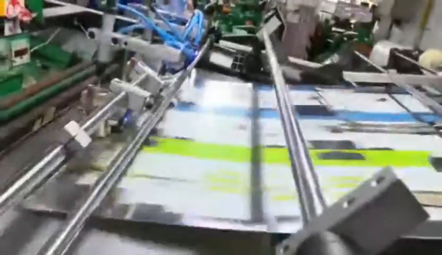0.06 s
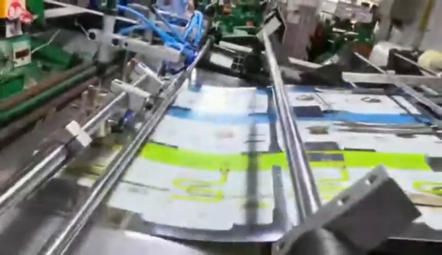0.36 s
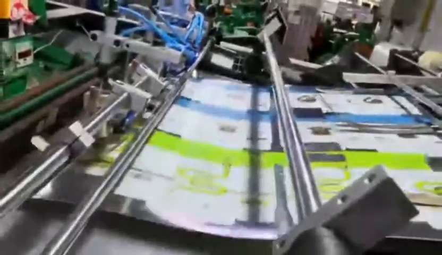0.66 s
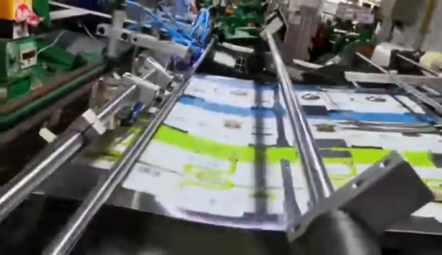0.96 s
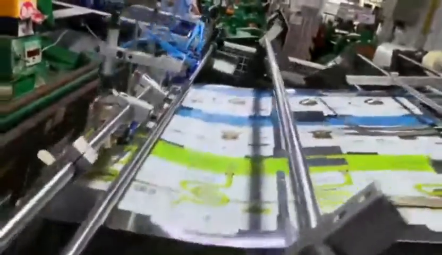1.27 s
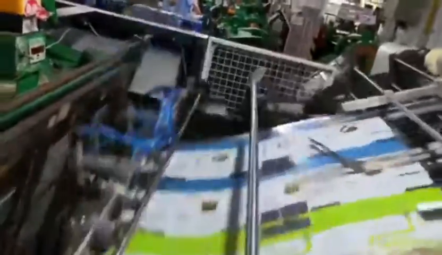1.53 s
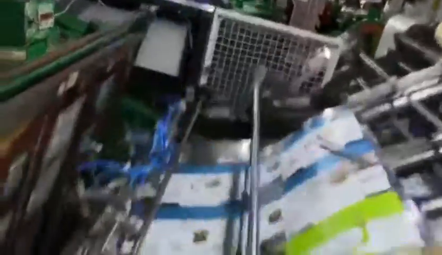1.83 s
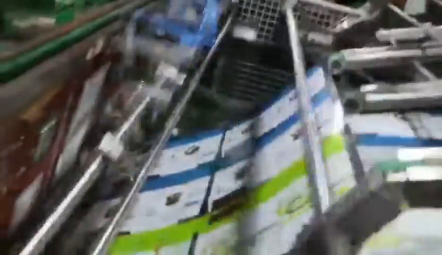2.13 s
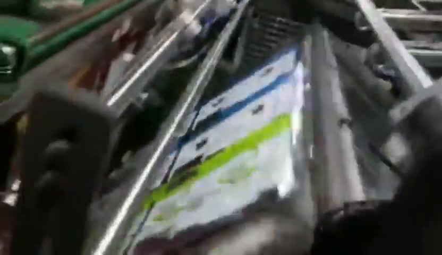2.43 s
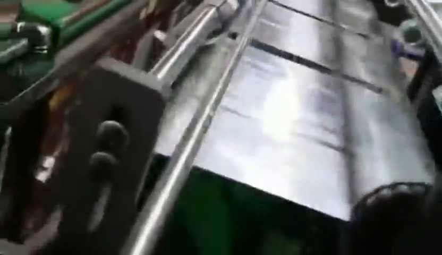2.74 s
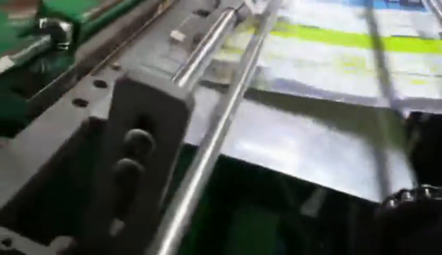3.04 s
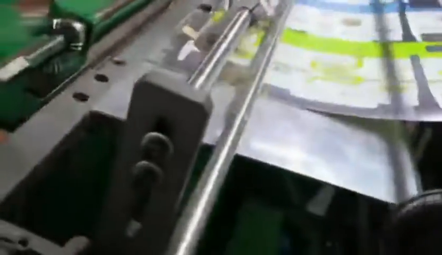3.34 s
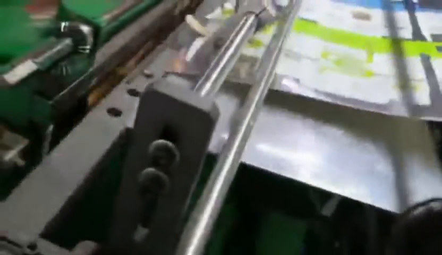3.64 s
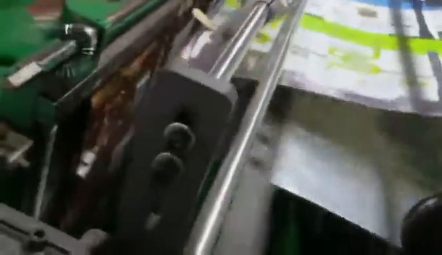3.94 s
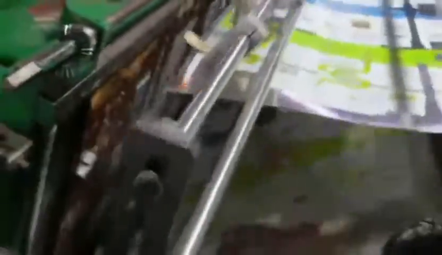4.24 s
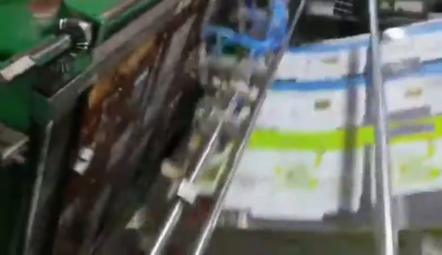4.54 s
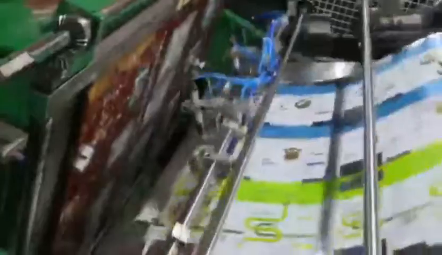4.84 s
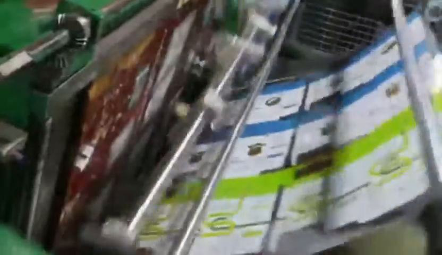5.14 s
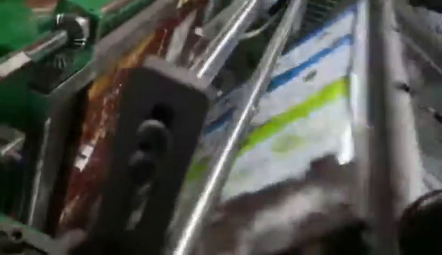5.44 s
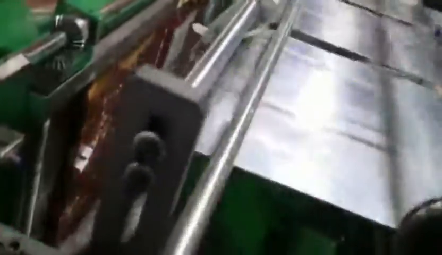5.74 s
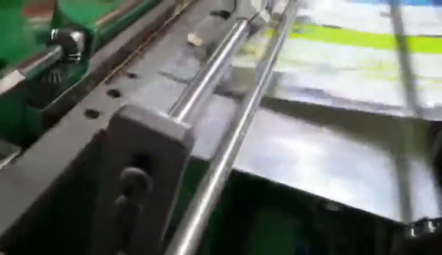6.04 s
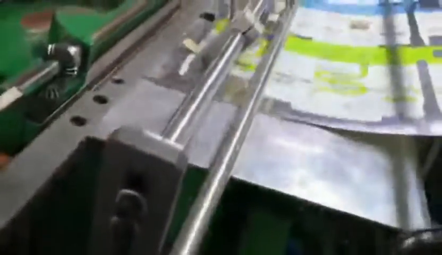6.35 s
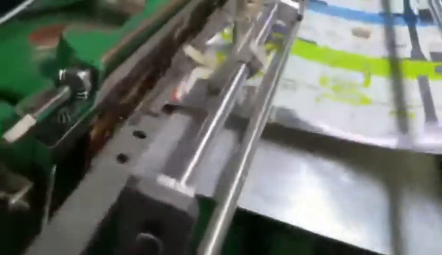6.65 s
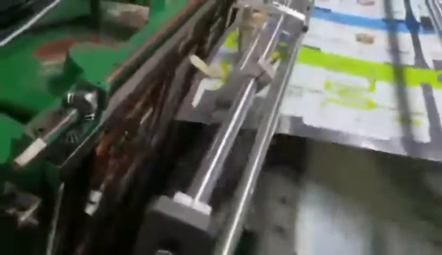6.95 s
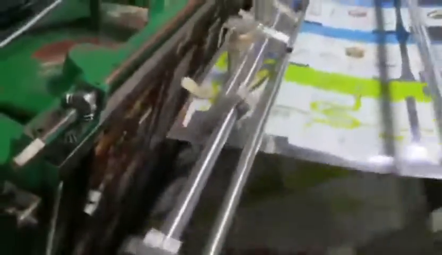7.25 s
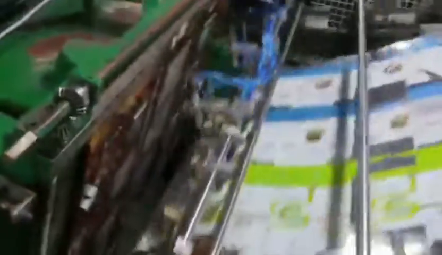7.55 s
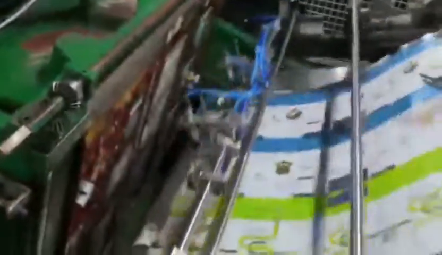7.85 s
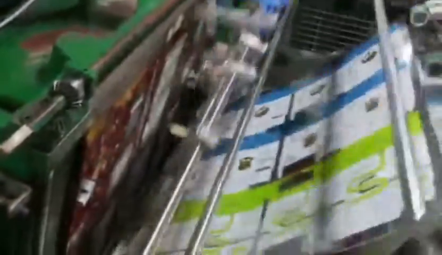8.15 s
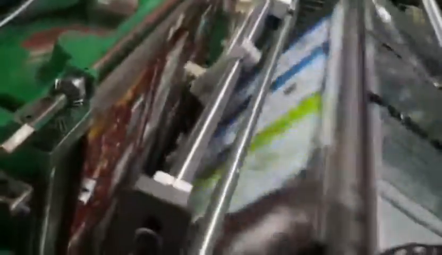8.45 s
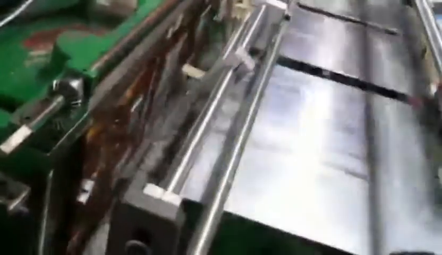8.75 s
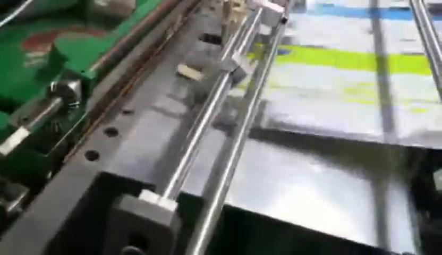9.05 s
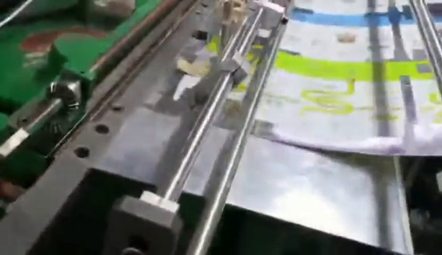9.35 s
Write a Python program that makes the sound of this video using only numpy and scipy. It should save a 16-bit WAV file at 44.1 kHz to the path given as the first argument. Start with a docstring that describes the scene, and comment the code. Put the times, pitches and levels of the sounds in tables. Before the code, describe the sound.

A die-cutting machine runs in a workshop, its drive droning and whining under a dense clatter of chains and a thin hiss of air. About every three seconds levers clash and the heavy press plate lands with a dull crash and a shuddering thump. Between the thumps come a sharp metal clack and a faint swish of a sheet. It sounds close, with the brighter sounds to the right.

```python
"""A die-cutting machine in a workshop

The machine cuts one sheet about every three seconds. Its drive drones and whines under a dense clatter
of chains and cams. In each cycle levers clash, the platen (the heavy pressing plate) thumps the frame,
air hisses, the gripper bar that pulls the sheet clacks against its stop, and the sheet swishes away.
The bright sounds lie to the right."""
import sys
import numpy as np
from scipy import signal
from scipy.fft import rfft, irfft, next_fast_len
from scipy.io import wavfile
from scipy.ndimage import uniform_filter1d

SR = 44100
rng = np.random.default_rng(int(sys.argv[2]) if len(sys.argv) > 2 else 0)


def transcribe(signal):
    """Save signal, clipped to [-1, 1], as a 16-bit WAV file at the path in sys.argv[1]."""
    frames = np.atleast_2d(signal).T
    limited = np.clip(frames, -1, 1)
    pcm = np.round(limited * 32767).astype(np.int16)
    wavfile.write(sys.argv[1], SR, pcm)


N = 422919
CYCLE_S, CYCLES = 2.975, 4

# The clatter and whine dip briefly after the crash. Each row: seconds into the cycle, change in dB.
CLATTER_LEVEL = [(.1, -1), (.35, 0.5), (.55, -3), (.75, 0.5), (.95, 0.5), (1.1, 2), (1.47, -0.5),
                 (1.7, 1.5), (2.2, 0.5), (2.5, 1.5), (2.7, -0.5), (2.85, 2)]
# The gripper bar hits its stop. Each row: start in seconds, level in dB, pitch in Hz.
BAR_CLACKS = [(1.837, -5, 1495), (4.78, -5.5, 1466), (7.741, -5, 1466)]


def amp(db):
    """Turns decibels into a gain."""
    return 10 ** (np.asarray(db) / 20)


def evened(x):
    """Scales a signal to an average (rms) level of one."""
    return x / np.sqrt(np.mean(x ** 2) + 1e-20)


def value_at(points, hz):
    """Reads between the rows of a table along a logarithmic frequency axis."""
    f, value = np.transpose(points)
    return np.interp(np.log(hz + 1), np.log(f + 1), value)


def add(mix, s, sound):
    """Lays a two-channel sound into the mix at s seconds."""
    part = mix[:, max(round(s * SR), 0):][:, :sound.shape[1]]
    part += sound[:, :part.shape[1]]


def cycling(points):
    """A level curve in dB that comes round in every cycle."""
    return np.interp(np.arange(N) / SR, *np.transpose(points), period=CYCLE_S)


def each_cycle(rows):
    """Repeats the events of one cycle for as long as the machine runs."""
    return [(cycle * CYCLE_S + s, *rest) for cycle in range(CYCLES)
            for s, *rest in rows if cycle * CYCLE_S + s < N / SR]


def coloured(x, spectrum):
    """Filters x so that white noise of level one takes the given spectrum."""
    size = next_fast_len(x.shape[1] + 4096)
    gain = amp(value_at(spectrum, np.fft.rfftfreq(size, 1 / SR))) * np.sqrt(SR / 2)
    return irfft(rfft(x, size) * gain, size)[:, :x.shape[1]]


def ringing(modes):
    """Narrow resonances kept ringing by random shaking."""
    size = next_fast_len(N)
    f = np.fft.rfftfreq(size, 1 / SR)
    power = sum(amp(db) ** 2 * evened(1 / (1 + (2 * (f - hz) / width) ** 2)) ** 2
                for hz, width, db in modes)
    return irfft(rfft(rng.standard_normal((2, size))) * np.sqrt(power), size)[:, :N]


def patchy(x, depth_db, width_hz, hold_s):
    """Lets narrow bands of the noise swell and fade at random, giving a mottled texture."""
    bands = signal.stft(x, nperseg=1024, noverlap=768)[2]
    swell = rng.standard_normal(bands.shape[1:])
    for axis, span in enumerate([width_hz * 1024 / SR, hold_s * SR / 256]):  # smooth in pitch, then time
        bell = np.exp(-(np.arange(-40, 41) / span * 2) ** 2)
        swell = signal.fftconvolve(swell, np.expand_dims(bell, 1 - axis), "same")
    gain = evened(amp(depth_db * evened(swell)))
    return signal.istft(bands * gain, nperseg=1024, noverlap=768)[1][:, :N]


def workshop(x, t60, wet_db):
    """Adds echoes from the housing and walls, which fade by 60 dB in t60 seconds."""
    t = np.arange(SR // 2) / SR
    tail = rng.standard_normal((2, len(t))) * amp(-60 * t / t60) * (1 - np.exp(-t / 0.0033))
    return x + amp(wet_db) * signal.oaconvolve(x, tail / np.linalg.norm(tail[0]), axes=1)[:, :N]


def drive(throb_hz=16.1, throb_db=1.5):
    """Panels drone with the load, gears whine along with the chains, and the floor rumbles."""
    # Ringing panels and frame, then gear and pump whines. Each row: pitch in Hz, width in Hz, level in dB.
    panels = [(81.2, 4.2, -38), (97.5, 32, -44), (157.6, 16, -24.5), (170.6, 21, -28.5), (195.4, 7.1, -27),
              (208.4, 28, -34), (233.3, 14, -33.5), (290, 61, -39.5), (354.7, 8.6, -42)]
    whines = [(490, 14, -47), (697, 8, -40.5), (843, 8, -38), (867, 9, -33.5), (893, 14, -40),
              (1621, 16, -36), (1836, 14, -34.5), (3172, 60, -40.5), (3370, 45, -43.5), (3471, 35, -40.5)]
    # The load peaks as the platen rises and the bar pulls away. Each row: seconds into the cycle, dB.
    load = [(.15, -1), (.25, 7.5), (.35, -4.5), (.52, 2), (.68, -1), (.77, 2), (.85, 0), (1.25, 1),
            (1.78, 2), (2.3, 2), (2.48, -1.5), (2.7, -2.5), (2.8, 2)]
    # The drone drifts slowly. Each row: time in seconds, level change in dB.
    drift = [(0, -1), (2.7, -0.4), (3.3, 0.5), (7.5, 0), (8.3, 0), (9.6, -.3)]
    # Rumble of the flywheel and floor. Each row: frequency in Hz, level in dB.
    rumble_tone = [(12, -57.5), (32, -46), (60, -49), (115, -45), (135, -48.5), (220, -51), (400, -58.5),
                   (700, -81), (2000, -87.5)]
    # The rumble rises and falls. Each row: seconds into the cycle, level change in dB.
    rumble_swell = [(.15, -0.5), (.45, 1.5), (.9, -2), (1.1, 1), (1.5, -1), (1.72, -1), (2.05, -4),
                    (2.42, -1.5), (2.6, -1), (2.69, -4.5), (2.82, -0.5)]
    t = np.arange(N) / SR
    drone = ringing(panels)
    # a driven panel swells less than one shaken at random
    drone /= uniform_filter1d(drone[0] ** 2, SR // 6) ** 0.39 / np.mean(drone[0] ** 2) ** 0.41
    throb = throb_db * np.sin(2 * np.pi * throb_hz * t)
    drone *= amp(cycling(load) + np.interp(t, *np.transpose(drift)) + throb)
    whine = ringing(whines) * amp(cycling(CLATTER_LEVEL))
    rumble = coloured(rng.standard_normal((2, N)), rumble_tone) * amp(cycling(rumble_swell))
    return drone + whine + rumble


def chains(taps_per_s=300, parts=6, spread_db=2, wash_db=-6, level_db=-3):
    """Links and rollers tap several ringing steel parts, over a wash of farther clatter."""
    # Tone of the clatter. Each row: frequency in Hz, level in dB.
    clatter_tone = [(150, -76), (330, -58.5), (580, -59.5), (770, -49), (1020, -51), (1270, -54),
                    (1600, -50.5), (1920, -47), (2350, -49), (2800, -57.5), (3350, -66), (3800, -67),
                    (7500, -74.5)]
    t = np.arange(SR // 4) / SR
    decay = amp(-60 * t / 0.16) + amp(-17 - 60 * t / 0.49)  # a quick fade and a softer, longer ring
    taps = np.zeros((2, N))
    for _ in range(parts):
        strength = amp(spread_db * np.minimum(rng.exponential(1, N), 4)) * rng.choice([-1, 1], N)
        blows = strength * (rng.random(N) < taps_per_s / parts / SR)
        ring = rng.standard_normal((2, len(t))) * decay
        taps += signal.oaconvolve(blows[None], ring, axes=1)[:, :N]
    rattle = evened(taps) + amp(wash_db) * rng.standard_normal((2, N))
    rattle = patchy(rattle, depth_db=1.7, width_hz=110, hold_s=.06)
    return coloured(rattle, clatter_tone) * amp(level_db + cycling(CLATTER_LEVEL))


def air(flutter_db=0.38):
    """Air hisses from the nozzles, fluttering."""
    # Tone of the hiss. Each row: frequency in Hz, level in dB.
    hiss_tone = [(1000, -81.5), (3000, -62.5), (4500, -67), (5700, -65.5), (6300, -69), (7050, -58),
                 (7600, -68)]
    # The hiss dips briefly after the crash. Each row: seconds into the cycle, level change in dB.
    hiss_level = [(.12, 1), (.3, -3), (.36, -7.5), (.57, -1.5), (.66, 2), (.8, 1), (.87, -1.5), (1.05, .5),
                  (1.7, 2), (1.8, 1), (2.25, 0.5), (2.65, 2.5), (2.85, -0.5)]
    flutter = evened(uniform_filter1d(rng.standard_normal(N), SR // 150))
    hiss = coloured(rng.standard_normal((2, N)), hiss_tone)
    hiss = patchy(hiss, depth_db=4, width_hz=89, hold_s=0.028)
    return hiss * amp(cycling(hiss_level) + flutter_db * flutter)


def dip():
    """Gain of the running noise, which dips briefly at each clack."""
    # Shape of the dip. Each row: seconds after the clack, level change in dB.
    dip_shape = [(-.02, -0.5), (.025, -10.5), (.09, -5), (.2, -0.5)]
    t = np.arange(N) / SR
    return amp(sum(np.interp(t - s, *np.transpose(dip_shape), left=0, right=0) for s, _, _ in BAR_CLACKS))


def valve(length_s=0.084, band_hz=(5900, 7900)):
    """A valve lets off a short, bright puff of air as the gripper bar arrives."""
    # The puffs. Each row: start in seconds, level in dB.
    puffs = [(1.69, -21), (4.668, -20), (7.63, -32)]
    out, shape = np.zeros((2, N)), signal.windows.hann(round(length_s * SR))
    band = signal.butter(2, band_hz, "bandpass", fs=SR)
    for s, db in puffs:
        hiss = signal.lfilter(*band, rng.standard_normal((2, SR // 4)))[:, :len(shape)]
        add(out, s, amp(db) * shape * evened(hiss))
    return out


def sheet(rasp_db=4):
    """The sliding sheet catches and slips: a raspy hiss whose pitch mostly sinks."""
    # The slides. Each row: seconds into the cycle, length in seconds, level in dB,
    # first pitch, last pitch and width in Hz.
    swishes = [(0.805, 0.038, -35, 5850, 5700, 450), (1.023, 0.098, -35, 6050, 5880, 700),
               (1.968, 0.13, -25.5, 5570, 4820, 610), (2.024, 0.18, -30, 4780, 3870, 762),
               (2.598, .15, -32.5, 5460, 4410, 1040), (2.871, 0.14, -31, 5300, 5310, 600)]
    out = np.zeros((2, N))
    for cycle in range(CYCLES):
        for s, length, db, first_hz, last_hz, width in swishes:
            hz = np.linspace(first_hz, last_hz, round(length * SR))
            rub = rng.standard_normal((5, SR // 2))[:, :len(hz)]
            band = signal.lfilter(*signal.butter(2, width / 2, fs=SR), rub[:2] + 1j * rub[2:4])
            hiss = (band * np.exp(2j * np.pi * np.cumsum(hz) / SR)).real  # low noise moved up to the pitch
            slips = amp(rasp_db * evened(uniform_filter1d(rub[4], SR // 300)))
            swish = evened(slips * hiss) * signal.windows.tukey(len(hz), .7)
            add(out, cycle * CYCLE_S + s, amp(db) * swish)
    return workshop(out, t60=.2, wet_db=-10)


def gripper(chatter_s=0.01, stray_hz=100, level_db=1):
    """The bar chatters for a moment against its stop, on one slightly unsteady pitch."""
    out, t = np.zeros((2, N)), np.arange(SR // 20) / SR
    shape = np.sin(np.pi * np.minimum(t / chatter_s, 1)) ** 2
    for s, db, hz in BAR_CLACKS:
        stray = np.cumsum(rng.standard_normal((2, len(t))), 1) * np.sqrt(2 * np.pi * stray_hz / SR)
        add(out, s, amp(level_db + db) * shape * np.sin(2 * np.pi * hz * t + stray))
    return workshop(out, t60=.1, wet_db=-8)


def levers(level_db=-31, spread_db=1.5):
    """Each knock builds as the parts settle together, then the ringing of the steel dies away."""
    # Levers and cams strike. Each row: seconds into the cycle, level in dB, ring and rise time in seconds.
    knocks = [(.221, -10, .18, 0.0055), (.288, -5.5, 0.13, 0.0063), (.309, -7, 0.17, 0.0042),
              (.8145, -4, 0.063, 0.00088), (1.02, -11.5, .2, 0.0035), (1.76, -8.5, .2, .005),
              (2.228, -14.5, .09, .003), (2.423, -14.5, .12, 0.0022), (2.61, -10, .13, 0.0044),
              (2.813, -8, .15, .005), (2.831, -9.5, .15, 0.0032)]
    # The bar rattles into its stop. Each row: seconds before the clack, then as for the knocks.
    bar_rattle = [(.022, -8.5, .16, .006), (0.0025, -6.5, 0.12, 0.0048)]
    # Tone of a steel lever. Each row: frequency in Hz, level in dB.
    steel_tone = [(80, -12.5), (280, -9.5), (520, -15), (850, -3.5), (1400, -5.5), (2050, -0.5),
                  (2800, -26), (3800, -19.5), (4600, -35.5), (5900, -26.5), (7500, -43)]
    out, t = np.zeros((2, N)), np.arange(SR // 3) / SR
    rattles = [(s - lead_s, *knock) for s, _, _ in BAR_CLACKS for lead_s, *knock in bar_rattle]
    for s, db, t60, rise_s in each_cycle(knocks) + rattles:
        shape = amp(-60 * t / t60) * (1 - np.exp(-t / rise_s))
        strength = amp(level_db + db + spread_db * rng.standard_normal())
        add(out, s, strength * shape * rng.standard_normal((2, len(t))))
    return workshop(coloured(out, steel_tone), t60=0.45, wet_db=-1.5)


def platen_crash(closes_s=.301, level_db=-2, t60=0.31, rise_s=0.0057):
    """Once a cycle the platen closes, and heavy cast parts meet with a short, dull crash."""
    # Tone of the cast metal. Each row: frequency in Hz, level in dB.
    casting_tone = [(120, -66.5), (290, -39.5), (420, -44.5), (600, -43.5), (850, -40), (1250, -44.5),
                    (1800, -56.5), (3000, -76)]
    out, t = np.zeros((2, N)), np.arange(SR // 3) / SR
    shape = amp(-60 * t / t60) * (1 - np.exp(-t / rise_s))
    for cycle in range(CYCLES):
        add(out, cycle * CYCLE_S + closes_s, amp(level_db) * shape * rng.standard_normal((2, len(t))))
    return coloured(out, casting_tone)


def platen_thumps(rise_s=0.0114):
    """Each blow rings the frame; its two strongest tones beat into a shudder."""
    # Blows on the frame. Each row: seconds into the cycle, level in dB, factor on the ring time.
    blows = [(.305, -17.5, 0.38), (.431, -11, .85), (.553, -15, .7), (1.315, -15.5, 0.24),
             (2.38, -21, 0.61)]
    # The frame's own tones. Each row: pitch in Hz, level in dB, ring time in seconds.
    frame_tones = [(81.25, -1, 1.23), (99.7, -0.5, 0.76), (119, -25, 0.48), (40, -26.5, .5)]
    # How hard the frame is shaken: one level change in dB for each cycle.
    stroke_db = [-0.5, -4.5, -1, -1]
    out, t = np.zeros((2, N)), np.arange(SR) / SR
    rise = 1 - np.exp(-(t / rise_s) ** 2)
    direct_only = np.array([[1], [0]])
    for s, db, ring in each_cycle(blows):
        # the tones swing together when the push is at its height
        shudder = sum(amp(tone_db - 60 * t / (t60 * ring)) * np.cos(2 * np.pi * hz * (t - 2 * rise_s))
                      for hz, tone_db, t60 in frame_tones)
        add(out, s, amp(db + stroke_db[int(s / CYCLE_S)]) * rise * shudder * direct_only)
    return out


def left_and_right(x, lag_s=.00063):
    """The right side faces the works; the left hears them later and duller, with scattered sound."""
    # How alike the two sides are. Each row: frequency in Hz, likeness from 0 to 1.
    likeness = [(60, 1), (110, 0.99), (180, .95), (300, 0.59), (560, 0.85), (1000, 0.36), (2000, 0.25),
                (4000, 0.15), (7500, 0.047)]
    # The left side is quieter. Each row: frequency in Hz, left minus right in dB.
    left_shade = [(60, -1), (180, -.5), (320, 0), (480, -1.4), (620, -3), (880, -5), (1500, -7),
                  (2500, -7.5), (4400, -7.5), (6200, -5), (7500, -7.5)]
    size = next_fast_len(N + 2048)
    hz = np.fft.rfftfreq(size, 1 / SR)
    direct, scattered = rfft(x, size)
    same = np.clip(value_at(likeness, hz), 0, 1)
    # long waves, below about 300 Hz, bend round and reach both sides almost together
    lag = np.exp(-2j * np.pi * hz * lag_s * hz ** 2 / (hz ** 2 + 300 ** 2))
    left = amp(value_at(left_shade, hz)) * (same * lag * direct + np.sqrt(1 - same ** 2) * scattered)
    return irfft(np.array([left, direct]), size)[:, :N]


def scene():
    """Mixes the machine as a direct and a scattered channel, then turns those into left and right."""
    running = (drive() + chains() + air()) * dip()
    machine = running + levers() + platen_crash() + gripper() + platen_thumps() + sheet() + valve()
    return left_and_right(machine)


def record(dry):
    """Clips peaks at full scale, then cuts the treble above 7640 Hz."""
    lowpass = signal.firwin(1023, 7640, window=("kaiser", 9), fs=SR)
    return signal.oaconvolve(np.clip(dry, -1, 1), lowpass[None], "same", axes=1)


dry = scene()
out = record(dry)
transcribe(out)
```